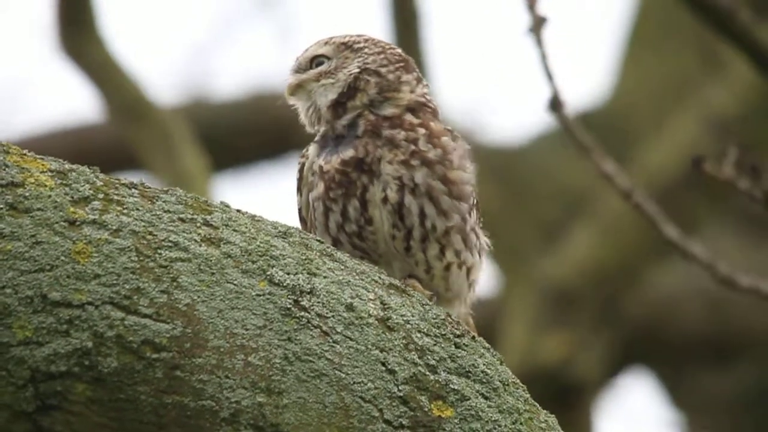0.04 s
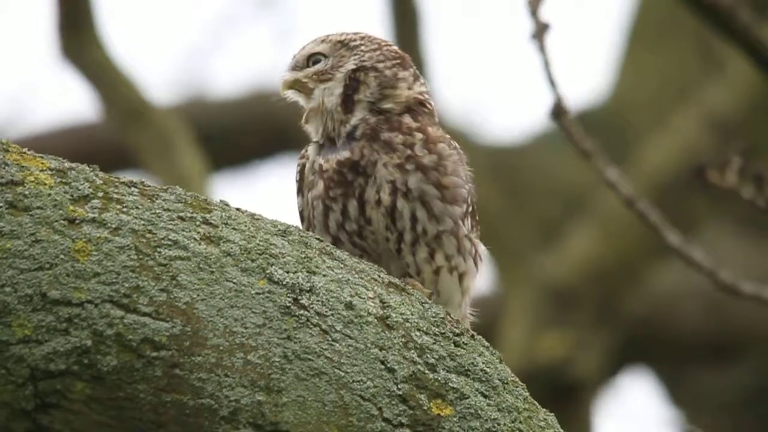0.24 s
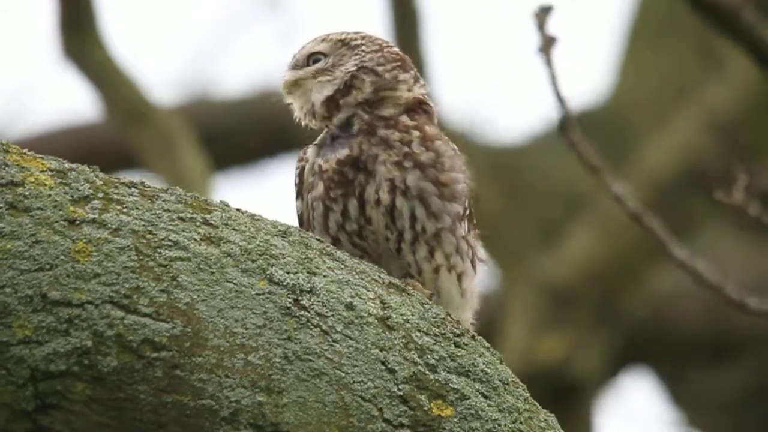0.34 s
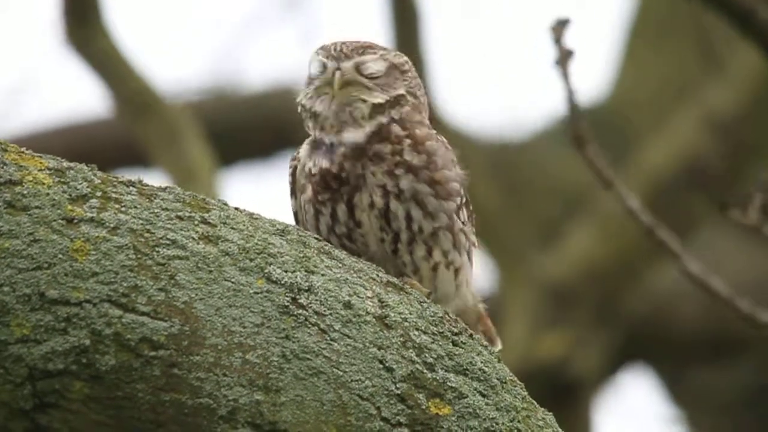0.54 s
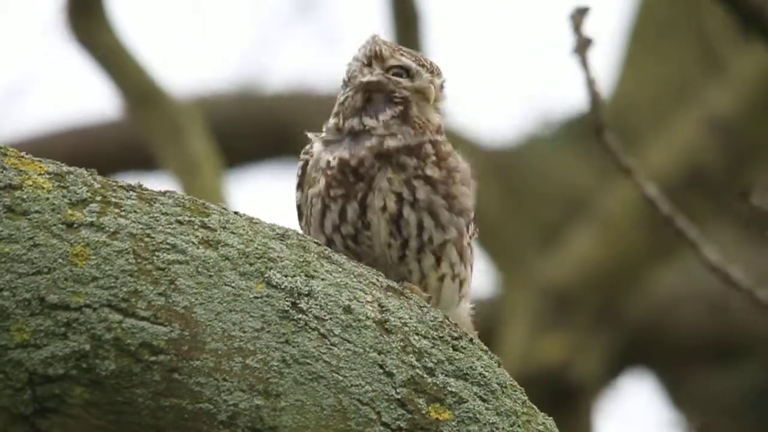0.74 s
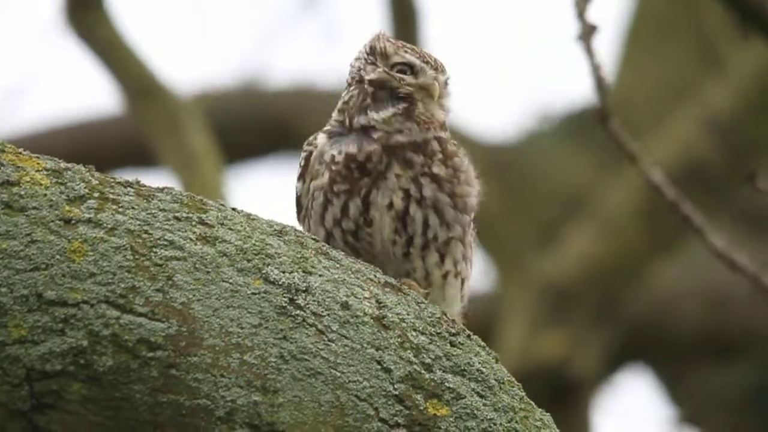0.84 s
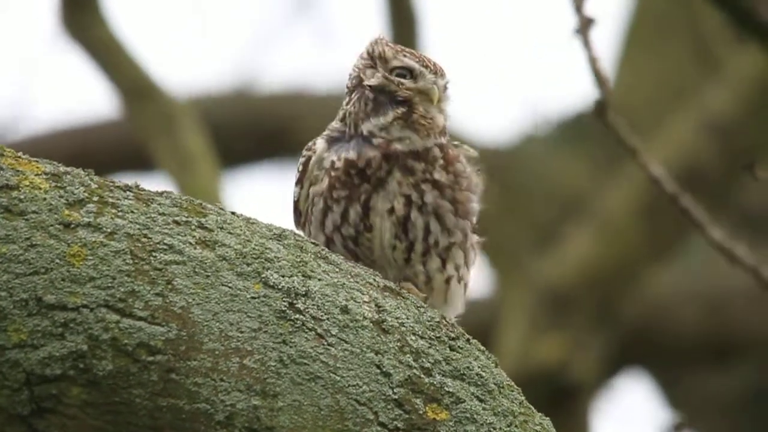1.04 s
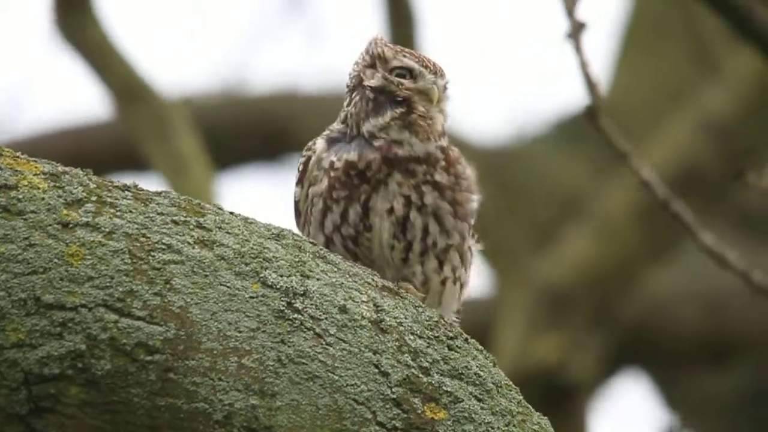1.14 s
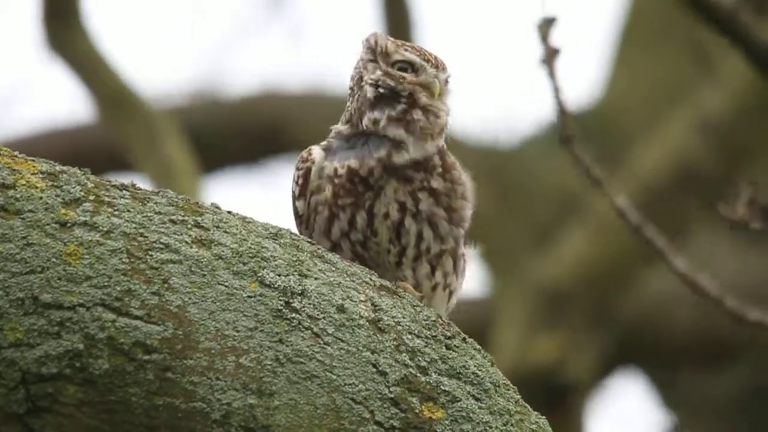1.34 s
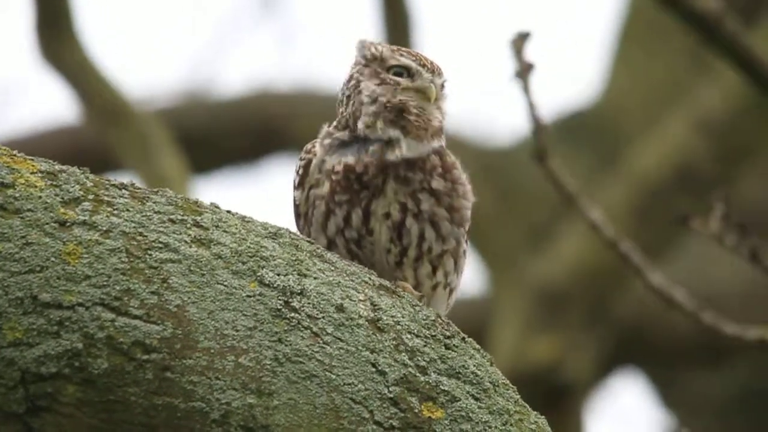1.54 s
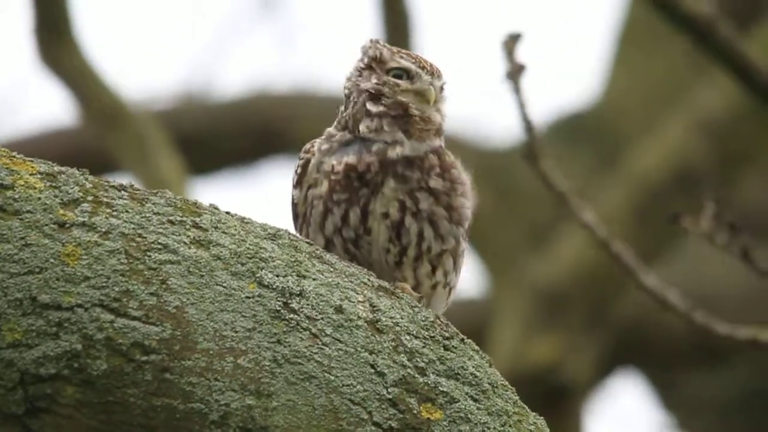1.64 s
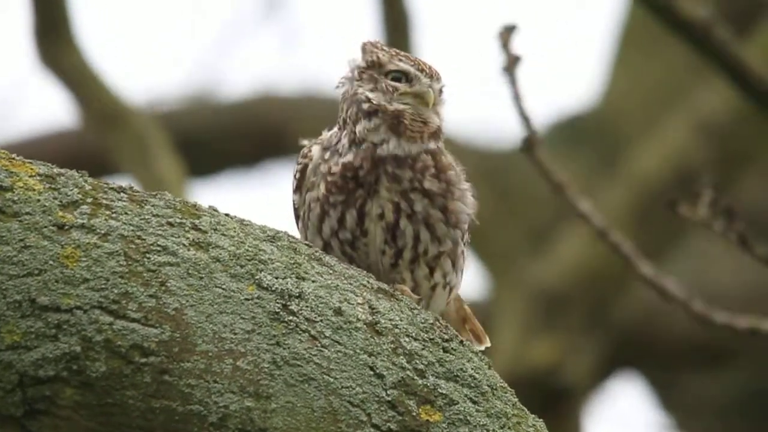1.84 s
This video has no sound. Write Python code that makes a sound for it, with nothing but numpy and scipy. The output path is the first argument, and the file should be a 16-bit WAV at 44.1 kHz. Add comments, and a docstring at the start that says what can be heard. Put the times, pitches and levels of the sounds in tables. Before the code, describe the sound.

Two sharp, raspy owl yelps ring out among trees, with far birds and a low rumble.

```python
"""A low outdoor rumble runs throughout, and a far bird gives a thin whistle. Then a little owl on a bough
yelps: one arch of pitch with a small hitch on the way down. At full effort its second harmonic (twice
the pitch) takes over and rasping overtones open above it. Branches and the wood throw the call back.
A far bird buzzes, and another whistles as the rumble swells. The owl yelps a second time, and a last
buzz and a long falling whistle end the scene."""
import sys
import numpy as np
from scipy import signal
from scipy.fft import rfft, irfft
from scipy.io import wavfile
from scipy.ndimage import uniform_filter1d

SR = 44100
rng = np.random.default_rng(int(sys.argv[2]) if len(sys.argv) > 2 else 0)


def wav_out(sig):
    """Save sig, one row per channel (or a flat mono array), as 16-bit PCM at SR to the path in sys.argv[1]."""
    wavfile.write(sys.argv[1], SR, np.round(np.clip(np.atleast_2d(sig).T, -1, 1) * 32767).astype(np.int16))


N = 83790


def amp(db):
    """Turns decibels into a number to multiply a sound by."""
    return 10 ** (np.asarray(db) / 20)


def unit(x):
    """Scales a signal so that its average size (rms) is 1."""
    return x / np.sqrt(np.mean(x ** 2) + 1e-20)


def read(points, hz):
    """Looks up a value between the rows of a frequency table, giving each octave equal room."""
    f, value = np.transpose(points)
    return np.interp(np.log(hz + 1), np.log(f), value)


def curves(rows):
    """Joins the rows of a time table into one smooth curve for each column after the time."""
    times, *columns = np.transpose(rows)
    return [uniform_filter1d(np.interp(np.arange(N) / SR, times, c), size=180) for c in columns]


def gate(rows):
    """Gently switches a sound on at a table's first time and off at its last."""
    t = np.arange(N) / SR
    return uniform_filter1d(1. * ((t > rows[0][0]) & (t < rows[-1][0])), size=200)


def noise(shape_db):
    """Noise whose level at each frequency is set by the function shape_db."""
    gain = amp(shape_db(np.fft.rfftfreq(N, 1 / SR)))
    return unit(irfft(rfft(rng.standard_normal(N)) * gain, N))


def wobble(hz):
    """A random drift, mostly slower than the given rate."""
    return noise(lambda f: -20 * np.log10(1 + (f / hz) ** 2))


# tone of the open air, from deep rumble to faint hiss (frequency [Hz], relative level [dB])
AIR_TONE = [(20, -28), (48, -11), (68, -4.5), (100, -2), (175, -4), (210, -9.5), (330, -10), (500, -17.5),
            (950, -13.5), (2100, -26), (2800, -25), (3400, -29), (10000, -35), (15500, -39)]
# how the rumble swells (time [s], bass boost [dB])
RUMBLE_SWELL = [(.65, 3.5), (.92, 10), (1.15, 1.5), (1.85, 7.5)]
AIR_DB, AIR_PATCHY_DB, RUMBLE_BELOW_HZ = -45, 0.5, 148
def air():
    """A distant rumble swells slowly under a faint hiss; both drift a little, in patches."""
    hz, t, spectrum = signal.stft(noise(lambda f: read(AIR_TONE, f)), SR, nperseg=1024)
    patches = uniform_filter1d(rng.standard_normal(spectrum.shape), size=10, axis=0)
    patches = unit(uniform_filter1d(patches, size=10, axis=1))
    swell_db = np.interp(t, *np.transpose(RUMBLE_SWELL)) / (1 + (hz[:, None] / RUMBLE_BELOW_HZ) ** 2)
    spectrum = spectrum * amp(AIR_PATCHY_DB * patches + swell_db)
    return amp(AIR_DB) * unit(signal.istft(spectrum, nperseg=1024)[1][:N])


BUZZ_RATE_HZ = 180
def far_note(rows, depth_hz):
    """A pure bird note; swinging its pitch quickly up and down by depth_hz makes it buzz."""
    hz, db = curves(rows)
    swing = np.sin(2 * np.pi * BUZZ_RATE_HZ * np.arange(N) / SR)
    phase = 2 * np.pi * np.cumsum(hz + depth_hz * swing) / SR
    return np.sqrt(2) * amp(db) * gate(rows) * np.sin(phase)


# far whistles, one list for each note (time [s], pitch [Hz], level [dB])
WHISTLES = [
    [(.17, 7800, -70), (.195, 8350, -64), (.22, 8650, -74)],
    [(.9, 3200, -71), (.936, 2974, -55.5), (.97, 2950, -55), (1.038, 3180, -64.5), (1.06, 3250, -74)],
    [(1.5, 3018, -60), (1.63, 2950, -51), (1.71, 2890, -50.5), (1.75, 2797, -59), (1.81, 2660, -57),
     (1.875, 2330, -68)],
]
# a small bird's thin buzzes, one list for each note (time [s], pitch [Hz], level [dB])
BUZZES = [
    [(.56, 6790, -70), (.605, 7340, -55), (.632, 7130, -58.5), (.66, 5800, -52), (.705, 5550, -63)],
    [(1.455, 6600, -81), (1.483, 5860, -59), (1.52, 5500, -68)],
]
BUZZ_DEPTH_HZ, FAR_ECHO_DB = 250, -6.5
def far_birds():
    """Birds whistle and buzz deeper in the wood, and the trees echo them."""
    whistles = sum(far_note(rows, depth_hz=0) for rows in WHISTLES)
    buzzes = sum(far_note(rows, BUZZ_DEPTH_HZ) for rows in BUZZES)
    notes = whistles + buzzes
    return notes + amp(FAR_ECHO_DB) * wood(notes)


# how the wood rings (frequency [Hz], time to fade by 60 dB [s], relative level [dB])
WOOD_RING = [(600, 0.14, 3.5), (951, 0.24, 6.5), (1400, 0.24, 3.5), (2580, 0.25, 1), (15000, 0.23, -1.5)]
WOOD_DELAY_S, ECHOES_PER_S = .006, 4000
def wood(x):
    """Trunks and twigs scatter a sound into many tiny echoes, which blur into a short tail."""
    echoes = rng.choice([-1., 1.], SR) * (rng.random(SR) < ECHOES_PER_S / SR)
    hz, t, spectrum = signal.stft(echoes, SR, nperseg=256)
    fade_s = read([(f, s) for f, s, db in WOOD_RING], hz)[:, None]
    tone_db = read([(f, db) for f, s, db in WOOD_RING], hz)[:, None]
    tail = signal.istft(spectrum * amp(tone_db - 60 * t / fade_s), SR, nperseg=256)[1]
    tail = np.r_[np.zeros(round(WOOD_DELAY_S * SR)), tail / np.linalg.norm(tail)]
    return signal.fftconvolve(x, tail)[:N]


# the arch of each yelp (time [s], pitch [Hz])
PITCH_1 = [(.203, 509), (.222, 847), (.232, 1106), (.238, 1082), (.267, 1280), (.289, 1369), (.301, 1378),
           (.318, 1337), (.349, 1216), (.367, 1152), (.39, 1064), (.397, 1142), (.425, 1085), (.447, 818),
           (.49, 590)]
PITCH_2 = [(1.208, 487.7), (1.234, 910.4), (1.242, 1091), (1.247, 1090), (1.272, 1241), (1.292, 1374),
           (1.304, 1406), (1.317, 1365), (1.344, 1191), (1.358, 1131), (1.385, 1052), (1.394, 1158),
           (1.424, 1087), (1.449, 854), (1.492, 576)]
# loudness of its two lowest tones (time [s], first harmonic [dB], second harmonic [dB])
LEVELS_1 = [(.2, -62, -36.5), (.217, -43, -47), (0.23, -24, -49.5), (.237, -33.5, -29.5), (.25, -36, -16),
            (.261, -28, -10.5), (0.274, -37.5, -16), (0.296, -25.5, -12), (.326, -34, -15),
            (0.354, -32.5, -14.5), (0.391, -27, -36.5), (0.403, -41, -43), (0.425, -22.5, -53.5),
            (0.451, -37, -49.5), (.49, -53, -49.5)]
LEVELS_2 = [(1.207, -84, -42), (1.222, -42.5, -45), (1.239, -25.5, -49.5), (1.248, -30.5, -27),
            (1.257, -37, -20), (1.274, -35.5, -17.5), (1.302, -27.5, -17.5), (1.323, -33, -12.5),
            (1.341, -31.5, -21.5), (1.364, -35.5, -19.5), (1.382, -25.5, -38.5), (1.406, -35, -56),
            (1.429, -21, -52), (1.452, -36, -48), (1.492, -54, -50.5)]
# its bright edge (time [s], gain of overtones and rasp [dB], extra gain of their top treble [dB])
EDGE_1 = [(.22, -73, -8), (.231, -59, 0), (.248, -37, -7), (.262, -39.5, -4), (.275, -45.5, 0),
          (.29, -39.5, -12), (.322, -41, -16), (.34, -40.5, -16), (0.361, -36, -8), (.385, -52.5, 9),
          (.42, -52, -8), (.452, -72, -5)]
EDGE_2 = [(1.23, -71, -8), (1.243, -55, -2), (1.255, -41, 5), (1.268, -36.5, 1), (1.28, -41, -1),
          (1.293, -35.5, 0), (1.311, -32.5, 0), (1.335, -41, 1), (1.364, -36, 0), (1.385, -53, -1),
          (1.42, -55, 0), (1.453, -64, -1)]
# the two yelps (pitch [table], loudness [table], edge [table], loudness shake [0-1], echo gain [dB])
YELPS = [(PITCH_1, LEVELS_1, EDGE_1, 0.034, -16.5), (PITCH_2, LEVELS_2, EDGE_2, 0.094, -14)]
JITTER, JITTER_HZ, SHIMMER_HZ = 0.001, 700, 125.5  # jitter shakes the pitch, shimmer the loudness
SLACK_JITTER, SLACK_BELOW_HZ = .26, 1000  # at its low start and end the voice is slack and shakes more
HARSH_AT_HZ, HARSH_WIDTH_HZ = 1260, 48  # the voice breaks up as it passes this pitch
RASP_DB, HARSH_BOOST_DB = -18.5, 7
TREBLE_FROM_HZ, TREBLE_FULL_HZ = 10600, 13900
def yelp(pitch, levels, edge, shimmer, echo_db):
    """The owl's slightly unsteady voice, with a puff of air on each vibration, and its echoes."""
    hz = curves(pitch)[0]
    first_db, second_db = curves(levels)
    upper_db, treble_db = curves(edge)
    jitter = JITTER + SLACK_JITTER * np.clip(1 - hz / SLACK_BELOW_HZ, 0, 1)
    phase = 2 * np.pi * np.cumsum(hz * (1 + jitter * wobble(JITTER_HZ))) / SR
    low = amp(first_db) * np.sin(phase) + amp(second_db) * np.sin(2 * phase)
    harsh = np.exp(-((hz - HARSH_AT_HZ) / HARSH_WIDTH_HZ) ** 2)
    puffs = 1 + .5 * np.cos(phase)
    rasp = throat_air() * puffs * amp(RASP_DB + HARSH_BOOST_DB * harsh)
    upper = (overtones(hz, phase, harsh) + rasp) * amp(upper_db)
    # separate the top treble so that it can have its own loudness
    treble_share = np.interp(np.fft.rfftfreq(N, 1 / SR), [TREBLE_FROM_HZ, TREBLE_FULL_HZ], [0, 1])
    treble = irfft(rfft(upper) * treble_share, N)
    voice = np.sqrt(2) * low + upper - treble + amp(treble_db) * treble
    call = voice * (1 + shimmer * wobble(SHIMMER_HZ)) * gate(pitch)
    return call + amp(echo_db) * (branches(call) + wood(call))


# tone of the rasp (frequency [Hz], relative level [dB])
RASP_TONE = [(1800, -33), (3100, 15), (4200, 15), (5500, -7), (7000, -9), (9000, 1), (12000, 1.5),
             (15500, -2)]
def throat_air():
    """Air rasps through the owl's throat."""
    return noise(lambda f: read(RASP_TONE, f))


# harmonics 3 to 14 on the side of the arch, at its top, and as the voice relaxes (relative level [dB])
SHRILL_DB = [-10, -27.5, -24.5, -16, -0.5, -14, -23, -7.5, -9.5, -12, -15, -16]
OPEN_DB = [-3.5, -8.5, -11, -13, -0.5, -6.5, -10, -12, -11, -10, -12, -15]
RELAXED_DB = [-17, -13, -13, -7.5, -8.5, -17, -6.5, -6, -13, -16, -20, -16]
OPEN_AT_HZ, OPEN_WIDTH_HZ = 1361, 97  # the voice opens as the pitch nears its top
HOLD_S, RELAX_S = 0.042, 0.024  # it holds after the top, then relaxes
FLUTTER_DB, FLUTTER_HZ = 3.3, 90  # each overtone swells and fades by itself
FRAY_RAD, HARSH_FRAY_RAD, FRAY_HZ = .025, .06, 600  # tiny timing slips roughen the tones
SPLIT_FROM_HARMONIC, SPLIT_DB = 10, -13  # extra tones half-way between the highest harmonics
def overtones(hz, phase, harsh):
    """The voice's higher tones: shrill, then open, then relaxed. When harsh they fray and split."""
    opened = np.exp(-((hz - OPEN_AT_HZ) / OPEN_WIDTH_HZ) ** 2)
    since_top_s = (np.arange(N) - np.argmax(hz)) / SR
    relaxed = np.clip((since_top_s - HOLD_S) / RELAX_S, 0, 1)
    phase = phase + (FRAY_RAD + HARSH_FRAY_RAD * harsh) * wobble(FRAY_HZ)
    stack = 0
    for k, (shrill_db, open_db, relaxed_db) in enumerate(zip(SHRILL_DB, OPEN_DB, RELAXED_DB), 3):
        effort_db = shrill_db + opened * (open_db - shrill_db)
        db = (1 - relaxed) * effort_db + relaxed * relaxed_db
        harmonic = amp(db + FLUTTER_DB * wobble(FLUTTER_HZ)) * np.sin(k * phase)
        split = harsh * amp(SPLIT_DB + FLUTTER_DB * wobble(FLUTTER_HZ)) * (k >= SPLIT_FROM_HARMONIC)
        stack = stack + harmonic + split * np.sin((k + .5) * phase)
    return np.sqrt(2) * stack


# echoes off near branches (delay [s], level compared with the wood's echo [dB])
BRANCH_ECHOES = [(.0073, 1), (0.0156, 0.5)]
def branches(x):
    """The nearest boughs each throw back one slightly late copy of the call."""
    t = np.arange(N) / SR
    return sum(amp(db) * np.interp(t - delay, t, x) for delay, db in BRANCH_ECHOES)


# one crack of the voice early in each yelp (time [s], level [dB])
CRACKS = [(.2325, -56), (1.2425, -50)]
CRACK_S = .0015
def cracks():
    """A tiny burst of rasp as the voice snaps from soft to loud."""
    t = np.arange(N) / SR
    bursts = sum(amp(db) * np.exp(-((t - at_s) / CRACK_S) ** 2) for at_s, db in CRACKS)
    return throat_air() * bursts


def scene():
    """Adds the owl, the far birds and the open air into one channel."""
    owl = sum(yelp(*row) for row in YELPS) + cracks()
    return (owl + far_birds() + air())[None]


CUTOFF_HZ = 15720
def record(dry):
    """Cuts away the very highest treble."""
    low_pass = signal.firwin(801, CUTOFF_HZ, window=("kaiser", 9), fs=SR)
    return signal.oaconvolve(dry, low_pass[None], "same")


dry = scene()
out = record(dry)
wav_out(out)
```